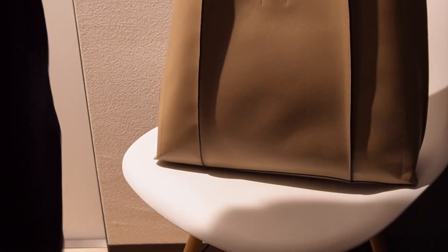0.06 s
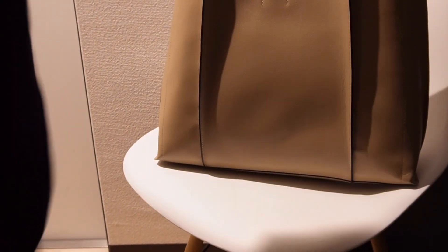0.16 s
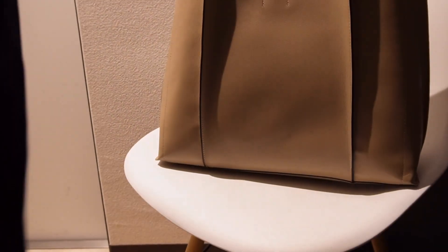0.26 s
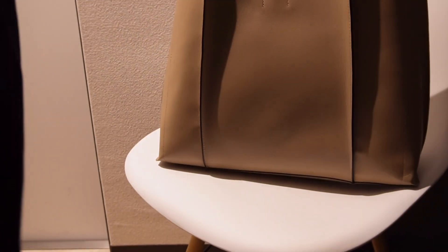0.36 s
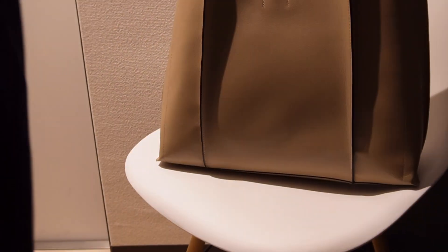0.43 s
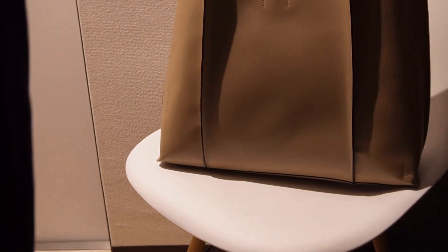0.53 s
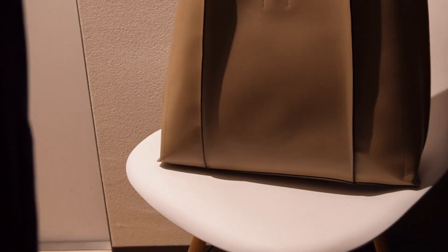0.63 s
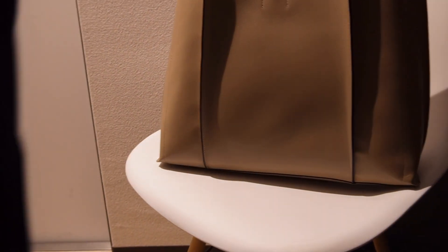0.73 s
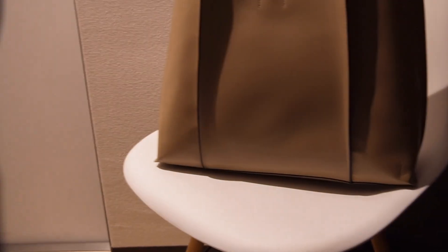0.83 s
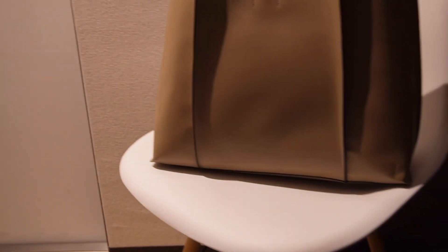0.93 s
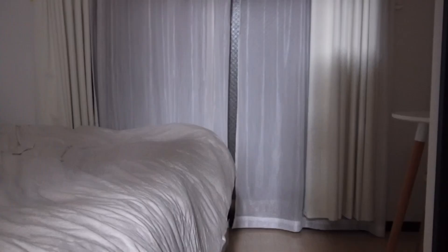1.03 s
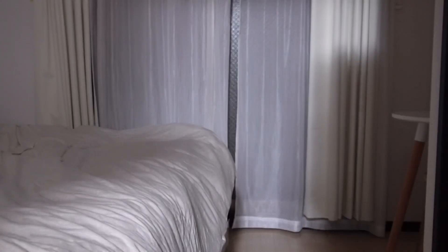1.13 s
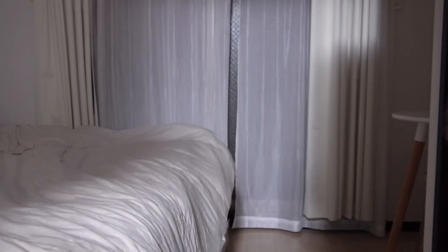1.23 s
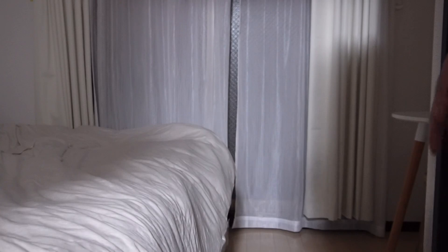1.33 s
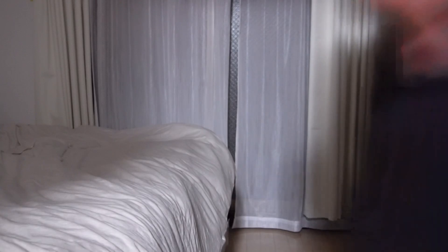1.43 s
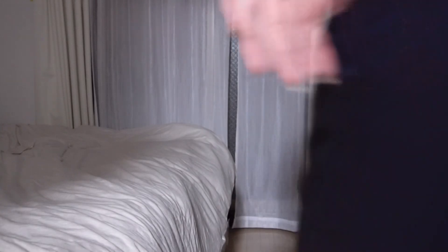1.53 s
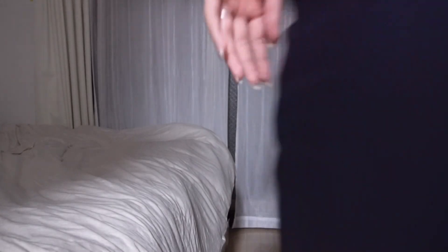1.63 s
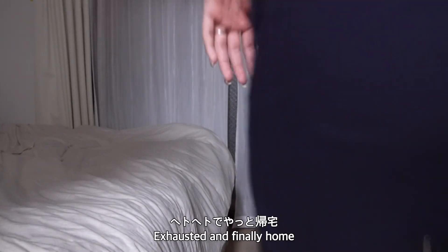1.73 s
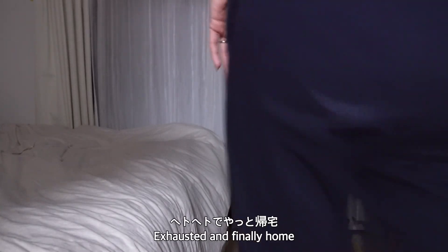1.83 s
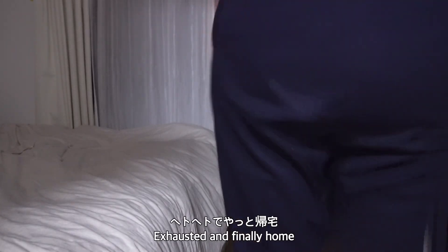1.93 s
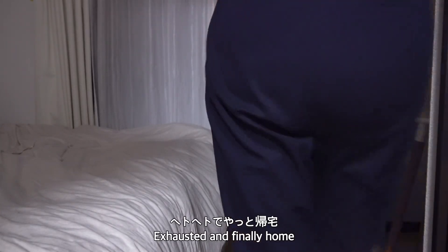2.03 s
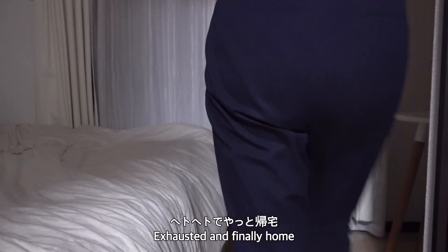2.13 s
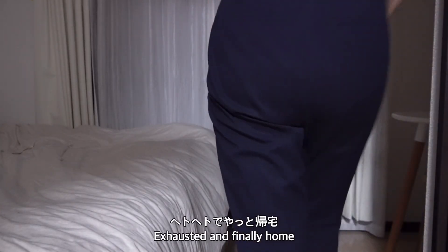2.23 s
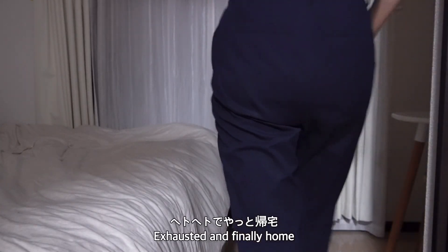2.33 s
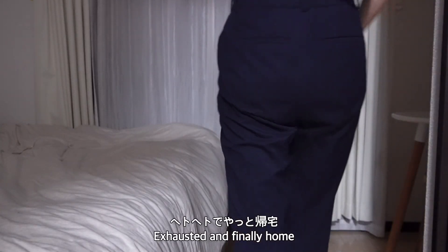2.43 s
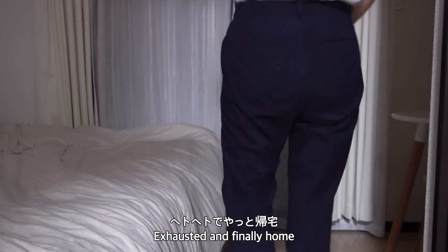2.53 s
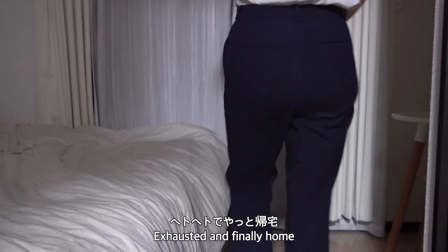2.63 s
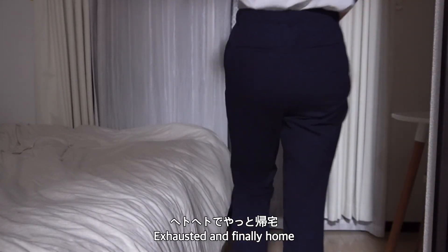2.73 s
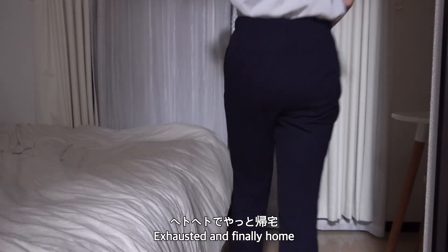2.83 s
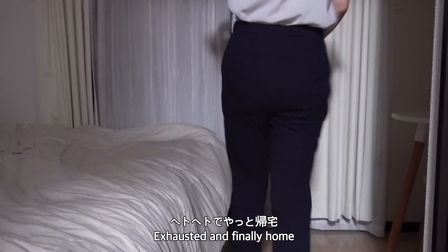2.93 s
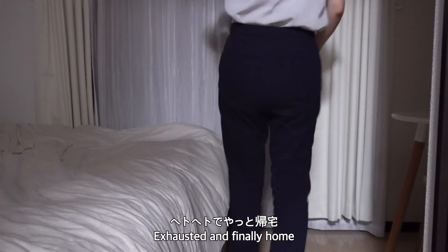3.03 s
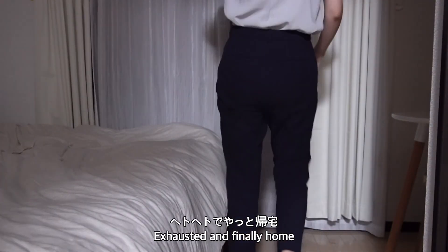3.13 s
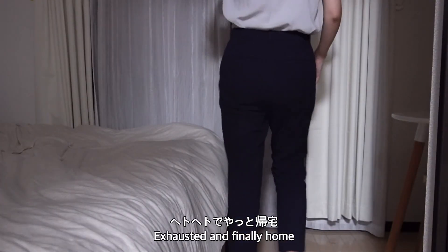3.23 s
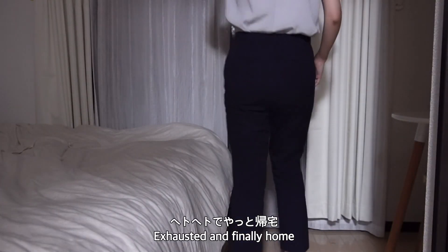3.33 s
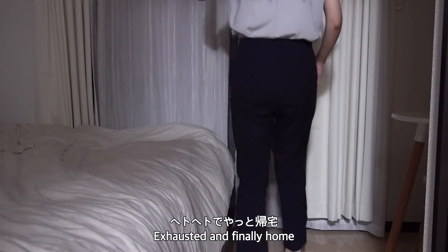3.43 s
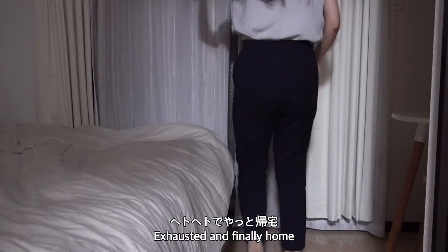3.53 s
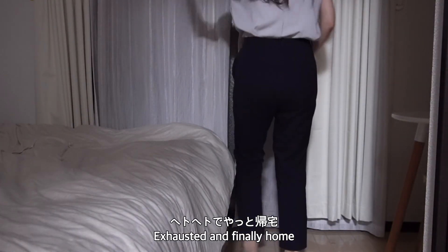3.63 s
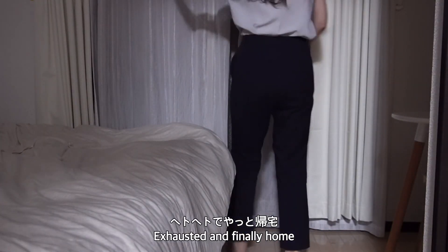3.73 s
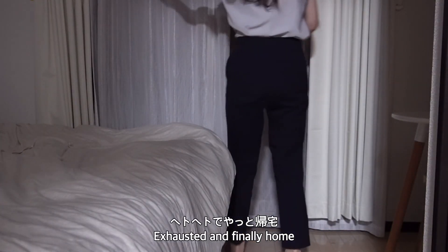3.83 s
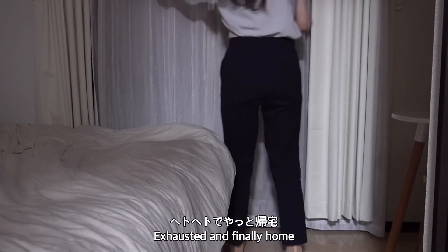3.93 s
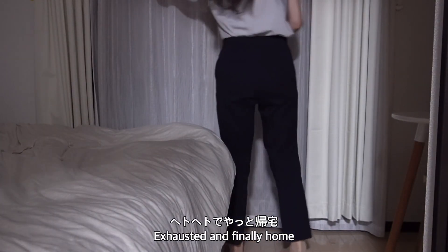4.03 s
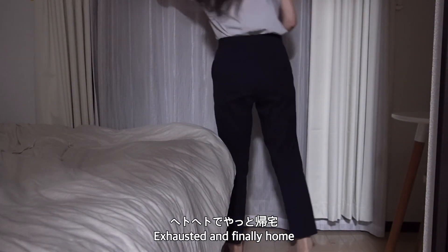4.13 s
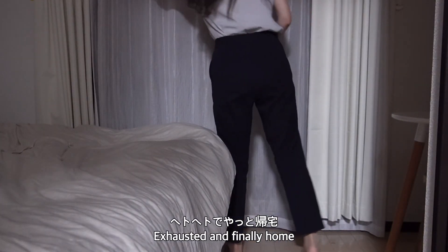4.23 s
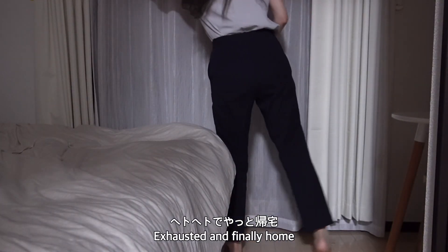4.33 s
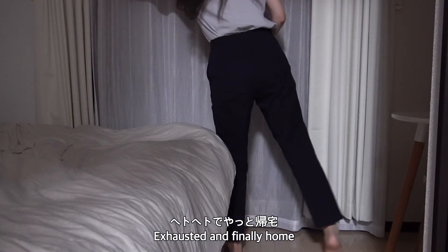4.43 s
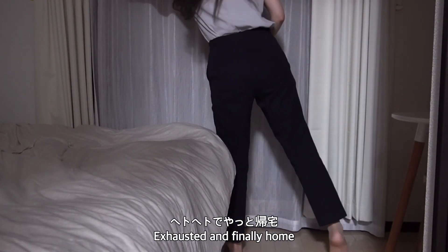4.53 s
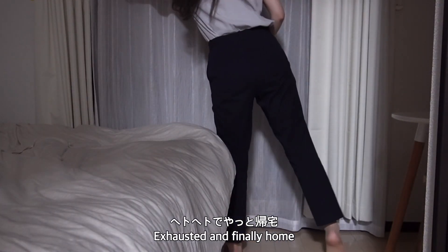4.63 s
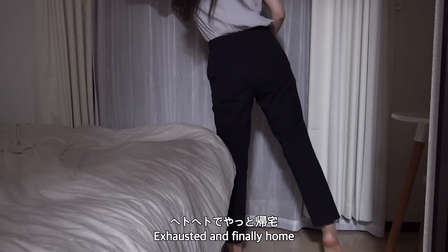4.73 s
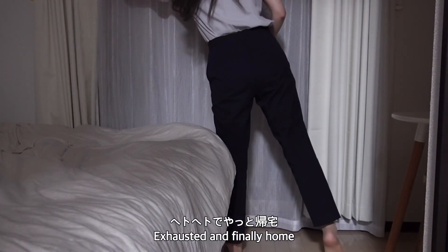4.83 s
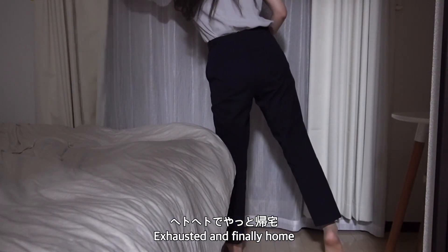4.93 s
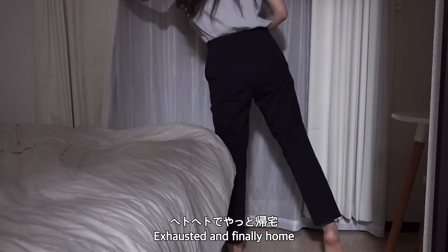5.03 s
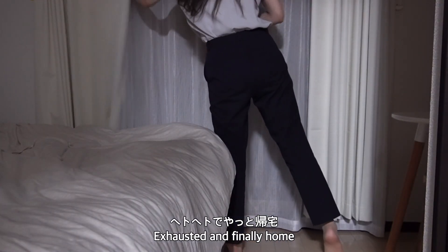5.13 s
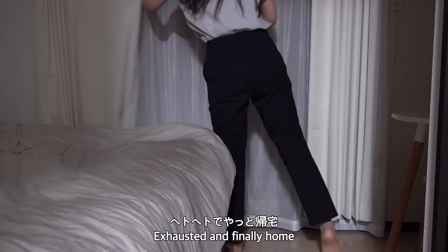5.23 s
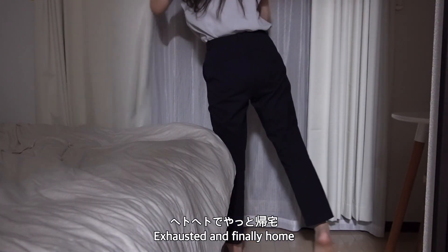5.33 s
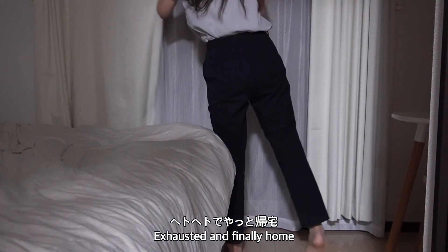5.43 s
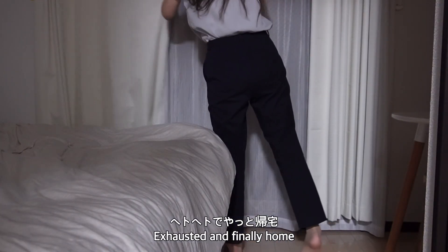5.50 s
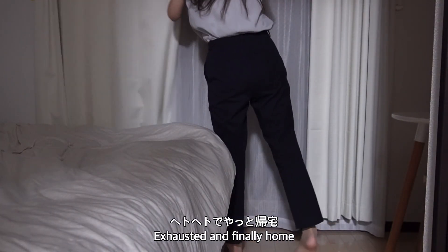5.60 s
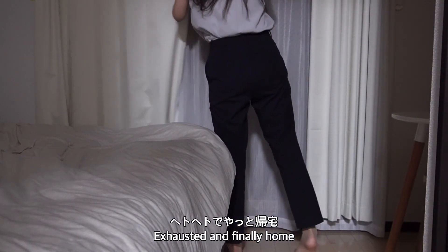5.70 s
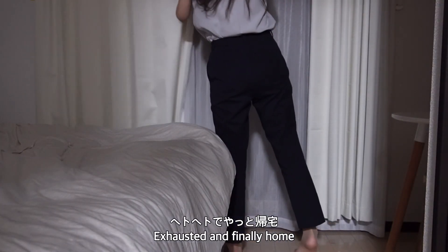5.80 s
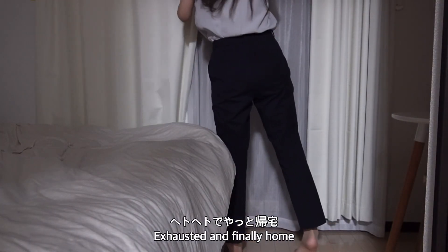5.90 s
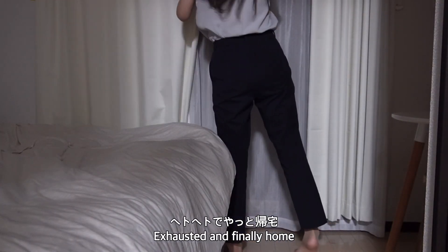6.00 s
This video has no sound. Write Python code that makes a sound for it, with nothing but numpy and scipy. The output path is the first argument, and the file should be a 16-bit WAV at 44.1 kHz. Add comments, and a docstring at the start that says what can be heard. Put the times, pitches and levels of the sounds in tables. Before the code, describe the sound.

Clothes rustle as someone puts down a bag, walks softly across a quiet room and pulls a curtain along its rail.

```python
"""A quiet bedroom, heard on a stereo microphone over a low household hum. Nearby, someone sets a bag on
a chair, ringing the seat, and walks to the window with swishing trousers, soft heels and a slipper's slap.
Farther off, a heavy curtain is pulled along its metal rail: the gliders rush, rattle and knock together,
and their ticks set the rail ringing. The level dips briefly just after the bag lands."""
import sys
import numpy as np
from scipy import signal
from scipy.io import wavfile

SR = 44100
rng = np.random.default_rng(int(sys.argv[2]) if len(sys.argv) > 2 else 0)


def digitize_waveform(pressure):
    """Quantize a signal to 16-bit integers and store it at the path in sys.argv[1].

    Rows of a 2-D input are taken as channels; values are limited to [-1, 1].
    """
    field = np.atleast_2d(pressure).T
    bounded = np.clip(field, -1, 1)
    quanta = np.round(bounded * 32767).astype(np.int16)
    wavfile.write(sys.argv[1], SR, quanta)


N = 267246

# spectrum of the household hum: frequency_hz, relative_db
HUM_SPECTRUM = [(20, -4), (70, -4), (186, 0.5), (275, 1.5), (334, -8), (560, -4.5), (750, -8.5), (1200, -9),
                (2000, -11), (4000, -14), (7000, -20), (10000, -27.5), (15600, -31)]
# slow swell of the hum: time_s, level_db
HUM_SWELL = [(0, -63.5), (.4, -67), (1.2, -60.5), (1.75, -64), (3.5, -62), (4.65, -66), (5.3, -61.5),
             (6.06, -64.5)]
# wavering tones in the hum: pitch_hz, width_hz, before_dip_db, after_dip_db
LOW_TONES = [(132.3, 11, -78.5, -75.5), (221.6, 21, -75.5, -80.5), (387, 43, -85.5, -78.5),
             (537.3, 42, -80.5, -71.5)]
# left-right likeness of hum and clothes at the microphone: frequency_hz, correlation
NEAR_CORRELATION = [(60, 0.92), (180, 0.86), (550, 0.62), (1650, 0.84), (4970, 0.75), (15000, 0.047)]
# brief dip of the whole sound: time_s, gain_db
LEVEL_DIP = [(1.036, 1), (1.044, -6), (1.0535, -25), (1.054, 0)]
# swishes of clothes, and the short hiss trailing the first taps; rise and fall span 20 dB:
# peak_s, level_db, rise_s, fall_s, centre_hz, treble_db_per_octave, bass_db_per_octave
SWISHES_AND_TAP_TAILS = [(.075, -59, 0.22, 0.15, 4300, 2.5, 0.5), (.168, -61, 0.033, 0.1, 3760, -2, 4.5),
                         (.27, -66, 0.21, 0.42, 3100, 0.5, 2), (.402, -66.5, .02, 0.11, 2700, -1, 6),
                         (0.524, -58, .03, 0.023, 2690, -12, 4.5), (.78, -47, 0.14, .17, 2610, 1, 1),
                         (.99, -63, 0.23, .1, 2580, -2, 2), (1.06, -53, 0.043, .2, 2700, 6, -2),
                         (1.1, -45, 0.11, 0.19, 4430, -6.5, 0.5), (1.204, -42.5, 0.12, 0.28, 2700, 3, -0.5),
                         (1.35, -46, 0.33, 0.41, 2730, 3.5, -1), (1.565, -47, 0.2, 0.062, 3900, 0.5, 0.5),
                         (1.66, -60, .3, 0.92, 3300, 1.5, 1), (1.965, -53.5, 0.48, 0.27, 3400, -1, 2.5),
                         (2.262, -51, 0.073, 0.31, 3740, -1.5, 1.5), (2.54, -57, 0.52, 0.31, 3250, 0, 1),
                         (2.85, -46.5, 0.12, 0.14, 4950, -5.5, -2), (3.06, -56, 0.32, 0.31, 3330, .5, 1),
                         (3.355, -44, 0.1, 0.13, 4360, -3.5, -2.5), (3.48, -59, .2, 0.43, 3300, -0.5, -4),
                         (3.768, -44.5, 0.02, 0.1, 2580, 1.5, 3), (3.94, -64.5, 0.13, .12, 2140, 3, 6),
                         (4.12, -68.5, 0.15, 0.096, 3400, 3.5, 1), (4.642, -65, 0.075, 0.15, 2370, 5.5, 8),
                         (4.748, -65, 0.093, .11, 2500, 3.5, 8), (4.82, -58.5, 0.045, .05, 3660, 1.5, -4)]
# spectral hump of their hiss: from_centre_octaves, relative_db
HISS_SPECTRUM = [(-1.5, -12), (-1, -3.5), (0.53, -1), (0.54, -4), (1, -8), (1.51, -16), (2.5, -34)]
# how far that hiss leans to the left: before_dip_db, after_dip_db
HISS_LEAN = (2, -0.3)
# heels on the floor: start_s, level_db, pitch_hz, t60_s
HEEL_FALLS = [(1.775, -53, 62.4, .2), (3.049, -61, 246, 0.19), (3.35, -55, 97, 0.17),
              (3.431, -55.5, 65, 0.094), (3.763, -48, 173, 0.085), (3.821, -53, 58, 0.16)]
# ticks and scuffs of hands and slippers: start_s, strength_db, pitch_hz, width_octaves, t60_s
SMALL_TAPS = [(.1625, -48, 3850, 0.44, 0.088), (.4022, -51, 1990, 1.6, 0.025),
              (0.5168, -42, 3700, 0.6, 0.028), (1.033, -48, 5200, 1.2, .04), (1.0125, -50.5, 5500, 2, .04),
              (1.566, -37.5, 3960, 2, 0.028), (2.2573, -38, 1900, 0.68, 0.038), (2.389, -46, 490, 1, 0.073),
              (2.8, -49, 450, 0.55, 0.09), (2.948, -48, 550, 0.56, 0.033), (3.7565, -39, 1820, 2.2, 0.18),
              (3.761, -45, 544, 0.84, 0.089), (3.92, -56, 1190, 1.5, 0.093)]
# a slipper slaps and drags: start_s, strength_db, t60_s
SLIPPER_SLAPS = [(2.254, -39.5, 0.12), (2.258, -40, 0.26), (2.282, -45, 0.15), (2.298, -44, 0.17)]
# resonances of its sole: pitch_hz, width_hz, relative_db
SOLE_MODES = [(2610, 96, -1), (4580, 280, 2), (6330, 250, 0)]
# the bag landing on the chair: start_s, strength_db, hardness_db_per_octave
BAG_KNOCKS = [(1.001, -42, 4), (1.0048, -36, -2), (1.0125, -44, 2), (1.0318, -37, 4)]
# modes of the chair seat: pitch_hz, relative_db, t60_s
SEAT_MODES = [(390, -7, 0.065), (670, 0, .045), (1010, -1, .035), (1240, -5, 0.03), (1890, -6, 0.018),
              (2570, -13, .03), (3330, -16, 0.018), (5200, -16, .02)]
# the pull of the curtain, heard as the rush of sliding: time_s, level_db
CURTAIN_PULL = [(4.816, -71), (4.828, -45.5), (4.862, -48), (4.978, -37), (5.104, -32.5), (5.16, -35),
                (5.3, -32.5), (5.34, -28), (5.39, -30), (5.444, -29), (5.716, -35), (5.916, -42),
                (6.06, -50)]
# spectrum of gliders and cloth sliding: frequency_hz, relative_db
RUSH_SPECTRUM = [(88, -66), (150, -31), (258, -18.5), (501, -14), (753, -14.5), (1000, -10.5), (1700, -8.5),
                 (2610, -5.5), (4250, -1), (5790, -5.5), (8880, -16.5), (10400, -12), (12500, -27),
                 (15600, -37)]
# left-right likeness of the rush, out of step below 0: frequency_hz, correlation
RUSH_CORRELATION = [(60, 0.82), (180, 1), (550, 0.94), (1650, .98), (4970, 0.89), (7500, 0.48),
                    (10000, 0.64), (12500, -0.41), (15000, -.6)]
# gliders knocking together: start_s, strength_db, high_ring_strength_db
GLIDER_CLACKS = [(4.8246, -43, -47), (4.913, -34, -47), (4.9844, -33, -34), (5.093, -22, -25),
                 (5.1736, -24, -27), (5.3277, -9.5, -21), (5.335, -23, -31), (5.3614, -34, -52),
                 (5.4494, -40, -32), (5.7244, -43, -38)]
# modes of the metal rail: pitch_hz, width_hz, relative_db
RAIL_MODES = [(954, 77, -7), (1684, 34, -7), (1940, 51, -6), (2660, 61, -5.5), (3320, 30, -1.5),
              (3484, 55, 1), (3680, 64, -2.5), (4170, 66, 1), (4336, 71, -2), (4370, 46, -5),
              (4610, 125, 1.5), (5600, 37, -8), (5580, 120, -2.5), (5990, 48, -2), (10000, 120, -0.5),
              (9980, 89, 0), (10250, 160, -6), (10900, 130, 2.5), (11470, 370, -0.5), (11850, 170, -6),
              (12600, 180, -8), (12600, 260, -1)]

DIP_END_S, PULL_START_S = LEVEL_DIP[-1][0], CURTAIN_PULL[0][0]
ROOM_T60_S, ROOM_DB, ROOM_WIDE_HZ, WALL_CUT_HZ = 0.43, -9, 2510, 5000
SWISH_ROUNDING, STILL_CLOTH_DB = 1.09, -100   # rounding: 1 = pointed peak, 2 = bell
SEAT_SHARE_DB, KNOCK_SCATTER_DB, KNOCK_ATTACK_S = -7, 3, 0.0008
FULL_SPEED_DB = -33   # below this rush the gliders slow: duller, thinner, less ring
BRIGHT_DB_PER_OCTAVE, BODY_DB, BODY_START_DB, BODY_GATHERS_S = 0.38, 1.5, -8, 0.27
GLIDER_TICKS_PER_S, CLACK_T60_S, CLACK_RING_T60_S, CLACK_LOW_CUT_HZ = 2000, 0.05, 0.088, 2800
HIGH_RING_HZ, WIDE_RING_HZ, HIGH_DRIVE_DB, SINK_DB_PER_S_PER_KHZ = 8000, 11000, -34.5, -5.5
CURTAIN_LEFT_DB, NEAR_ROOM_SEND_DB = 0.5, -4
MIC_LOW_CUT_HZ, TOP_CUT_HZ = 60, 15750


def from_db(db):
    """Gain of a level in dB."""
    return 10 ** (np.asarray(db) / 20)


def rms_one(x):
    """Scaled to rms 1."""
    return x / np.sqrt(np.mean(x ** 2) + 1e-20)


def in_time(rows):
    """Columns of a curve, one value a sample."""
    times_s, *columns = np.transpose(rows)
    return [np.interp(np.arange(N) / SR, times_s, column) for column in columns]


def at_hz(points, hz):
    """A spectrum read on a log-frequency axis."""
    frequencies, values = np.transpose(points)
    return np.interp(np.log(hz), np.log(frequencies), values)


def filtered(x, hz, kind, order=2):
    """Butterworth filter."""
    return signal.sosfilt(signal.butter(order, hz, kind, fs=SR, output="sos"), x + 1e-18)


def resonance(x, hz, width_hz):
    """Two-pole peak with gain 1 on top."""
    r = np.exp(-np.pi * width_hz / SR)
    feedback = [1, -2 * r * np.cos(2 * np.pi * hz / SR), r * r]
    return signal.lfilter((1 - r * r) / 2 * np.array([1, 0, -1]), feedback, x + 1e-18)


def drift(rate_hz):
    """Slow random wander of spread 1: low-passed noise drawn every 40th sample."""
    r = np.exp(-2 * np.pi * rate_hz * 40 / SR)
    slow = signal.lfilter([1], [1, -2 * r, r * r], rng.standard_normal(N // 40 + 2002))[2000:]
    return np.interp(np.arange(N) / 40, np.arange(len(slow)), rms_one(slow))


def grains(per_s, uneven_db):
    """Random tiny slips of uneven size; rms 1."""
    sizes = from_db(uneven_db * np.minimum(rng.exponential(1, N), 5)) * rng.choice([-1, 1], N)
    return rms_one(sizes * (rng.random(N) < per_s / SR))


def bursts(rows):
    """Envelope of sudden blows, each dying with its own t60."""
    out, t = np.zeros(N), np.arange(SR // 2) / SR
    for start_s, peak_db, t60_s in rows:
        at = round(start_s * SR)
        out[at:at + len(t)] += from_db(peak_db - 60 * t / t60_s)[:N - at]
    return out


def band_noise(colour_db, correlation, first_band, flicker_db, flicker_hz, slips=0, slip_share=0):
    """Flickering stereo noise in third octaves, shaped by colour_db(hz), roughened by slips; rms 1."""
    out, edges = 0, 22 * 2 ** (np.arange(first_band, 30) / 3)
    white = rng.standard_normal((2, 2, N))
    rough = white * np.sqrt(1 - slip_share) + np.sqrt(slip_share) * np.abs(slips) * np.sign(white)
    shared_flicker = drift(flicker_hz)
    for k, (low, high) in enumerate(zip(edges, edges[1:])):
        mid, side = filtered(rough[k % 2], [low, high], "band")
        hz = np.sqrt(low * high)
        alike = np.clip(at_hz(correlation, hz), -1, 1)
        gain = from_db(colour_db(hz) + flicker_db * (shared_flicker + 0.88 * drift(flicker_hz)))
        out = out + gain * (np.sqrt(1 + alike) * mid + np.sqrt(1 - alike) * side * [[1], [-1]])
    return rms_one(out)


def household_hum():
    """A low bed of noise with a few wavering tones, whose balance shifts at the dip."""
    bed = band_noise(lambda hz: at_hz(HUM_SPECTRUM, hz), NEAR_CORRELATION,
                     first_band=0, flicker_db=0.73, flicker_hz=8.4)
    white, before_dip = rng.standard_normal(N), np.arange(N) < DIP_END_S * SR
    tones = sum(from_db(np.where(before_dip, before_db, after_db)) * rms_one(resonance(white, hz, width))
                for hz, width, before_db, after_db in LOW_TONES)
    return from_db(in_time(HUM_SWELL)[0]) * bed + tones


def bedroom_tail(x):
    """Diffuse reflections, centred in the bass and wide in the treble, dulled by soft furnishings."""
    t = np.arange(SR // 3) / SR
    mid, side = rng.standard_normal((2, len(t))) * from_db(-60 * t / ROOM_T60_S) * (t > 0.004)
    tails = mid + filtered(side, ROOM_WIDE_HZ, "high") * [[1], [-1]]
    tails = filtered(tails, WALL_CUT_HZ, "low", order=1)
    tails /= np.sqrt(np.sum(tails ** 2, axis=1, keepdims=True))
    return from_db(ROOM_DB) * signal.fftconvolve(x[None], tails, axes=1)[:, :N]


def heel_thuds():
    """A soft heel sets the floor swinging for a few cycles."""
    out, t = np.zeros(N), np.arange(SR // 2) / SR
    attack = 1 - np.exp(-t / 0.0015)
    for start_s, level_db, hz, t60_s in HEEL_FALLS:
        at = round(start_s * SR)
        out[at:at + len(t)] += from_db(level_db - 60 * t / t60_s) * attack * np.sin(2 * np.pi * hz * t)
    return out


def taps():
    """Hands and slippers touch things: each a click with a puff of noise behind it, round one pitch."""
    out, noise = np.zeros(N), rng.standard_normal(N)
    for start_s, strength_db, hz, octaves, t60_s in SMALL_TAPS:
        low, high = np.clip(hz * 2 ** (np.array([-0.5, 0.5]) * octaves), 50, 0.45 * SR)
        push = noise * bursts([(start_s, strength_db, t60_s)])
        push[round(start_s * SR)] += 4.5 * from_db(strength_db)   # the click
        make_up = np.sqrt(SR / 2 / (high - low))   # for the noise outside the band
        out += 0.5 * make_up * filtered(push, [low, high], "band")
    return out


def slipper_slap():
    """Friction noise of the slap, coloured by the sole's resonances."""
    friction = rng.standard_normal(N)
    sole = sum(from_db(db) * rms_one(resonance(friction, hz, width)) for hz, width, db in SOLE_MODES)
    return 0.28 * rms_one(sole) * bursts(SLIPPER_SLAPS)


def clothes_and_tap_tails():
    """Grainy hiss of fibres slipping in swishes, also trailing the first taps; the loudest colours it."""
    peak_s, peak_db, rise_s, fall_s, *colours = np.array(SWISHES_AND_TAP_TAILS).T[:, :, None]
    t = np.arange(0, N / SR + 0.002, 0.002)
    from_peak = np.where(t < peak_s, (peak_s - t) / rise_s, (t - peak_s) / fall_s)
    power = from_db(2 * np.maximum(peak_db - 20 * from_peak ** SWISH_ROUNDING, STILL_CLOTH_DB))
    total = power.sum(axis=0)
    blend = [(power * colour).sum(axis=0) / total for colour in colours]
    level_db, centre_hz, treble_tilt, bass_tilt = in_time(np.transpose([t, 10 * np.log10(total), *blend]))
    lean_db = np.where(np.arange(N) < DIP_END_S * SR, *HISS_LEAN) * [[0.5], [-0.5]]

    def hump_db(hz):
        octaves = np.log2(hz / centre_hz)
        tilt_db = np.where(octaves > 0, treble_tilt, bass_tilt) * np.abs(octaves)
        return np.interp(octaves, *np.transpose(HISS_SPECTRUM)) + tilt_db
    hiss = band_noise(hump_db, NEAR_CORRELATION, first_band=12, flicker_db=0.55, flicker_hz=24,
                      slips=grains(per_s=2500, uneven_db=0.66), slip_share=0.3)
    return from_db(level_db + lean_db) * hiss


def bag_on_chair():
    """Each knock of the soft bag rings the seat's modes; a harder knock favours the high ones."""
    out, t = np.zeros(N), np.arange(SR // 4) / SR
    attack = 1 - np.exp(-t / KNOCK_ATTACK_S)
    for start_s, strength_db, hardness in BAG_KNOCKS:
        at = round(start_s * SR)
        for hz, mode_db, t60_s in SEAT_MODES:
            level_db = strength_db + SEAT_SHARE_DB + mode_db + hardness * np.log2(hz / 1000)
            level_db += rng.normal(0, KNOCK_SCATTER_DB)
            envelope = from_db(level_db - 60 * t / t60_s) * attack
            out[at:at + len(t)] += envelope * np.sin(2 * np.pi * hz * t)
    return out


def sliding_rush(rush_db, slowing_db, pulling_s, clacks):
    """Gliders and cloth rub along the rail, brighter with speed; each clack adds a burst."""
    tilt = BRIGHT_DB_PER_OCTAVE + 0.24 * slowing_db
    surge_db = np.maximum(rush_db - FULL_SPEED_DB, 0)
    body_db = BODY_DB + 0.18 * slowing_db - 0.48 * surge_db   # surges are all gliders, little cloth
    body_db += BODY_START_DB * np.clip(1 - pulling_s / BODY_GATHERS_S, 0, 1)   # the heavy folds join in

    def colour_db(hz):
        bass_share = np.clip(np.log2(2000 / hz), 0, 1)
        return at_hz(RUSH_SPECTRUM, hz) + tilt * np.log2(hz / 4000) + body_db * bass_share
    friction = band_noise(colour_db, RUSH_CORRELATION, first_band=6, flicker_db=0.76, flicker_hz=19,
                          slips=grains(per_s=3000, uneven_db=3), slip_share=0.2)
    return friction * ((pulling_s >= 0) * from_db(rush_db) + 0.13 * clacks)


def rail_ring(rush_db, slowing_db, pulling_s, clacks):
    """Ticks and clacks of the small gliders ring the metal rail's modes."""
    moving = pulling_s >= 0
    ticks = grains(GLIDER_TICKS_PER_S, uneven_db=2.9)
    clacking = filtered(ticks * clacks, CLACK_LOW_CUT_HZ, "high")
    low_ticks = ticks * moving * from_db(rush_db + 6) + 0.92 * clacking
    high_clacks = bursts([(start_s, db, CLACK_RING_T60_S) for start_s, _, db in GLIDER_CLACKS])
    high_drive = moving * from_db(HIGH_DRIVE_DB + 1.4 * slowing_db) + high_clacks
    # the high ring spreads along the rail, so each channel gets ticks partly of its own
    own = np.array([grains(GLIDER_TICKS_PER_S, uneven_db=2.7) for _ in range(2)])
    spreads = np.array([0.93 * ticks + 0.4 * own, 0.36 * ticks + 1.34 * own]) * high_drive
    # ticks narrowed to a band round 10 kHz, keeping the high ring's top soft
    high_ticks, wide_ticks = resonance(spreads, hz=10400, width_hz=3400)
    ring = 0
    for hz, width_hz, mode_db in RAIL_MODES:
        wander_db = 2.35 * drift(rate_hz=6.7)   # strength changes as the gliders travel
        # modes above 10 kHz fade as the folds spread over the rail
        sink_db = SINK_DB_PER_S_PER_KHZ * max(hz / 1000 - 10, 0) * pulling_s * moving
        drive = wide_ticks if hz > WIDE_RING_HZ else high_ticks if hz > HIGH_RING_HZ else low_ticks
        ring = ring + from_db(mode_db + wander_db + sink_db) * resonance(drive, hz, width_hz)
    return ring


def curtain():
    """One pull, with gliders knocking together, drives both the rush and the ring."""
    rush_db, = in_time(CURTAIN_PULL)
    slowing_db = np.minimum(rush_db - FULL_SPEED_DB, 0)
    pulling_s = np.arange(N) / SR - PULL_START_S
    clacks = bursts([(start_s, db, CLACK_T60_S) for start_s, db, _ in GLIDER_CLACKS])
    motion = rush_db, slowing_db, pulling_s, clacks
    return sliding_rush(*motion), rail_ring(*motion)


def scene():
    """All sources at the microphone; the blows are nearer than the rail, so they raise less room."""
    rush, ring = curtain()
    blows = taps() + bag_on_chair() + slipper_slap()
    at_window = (rush + ring) * from_db([[CURTAIN_LEFT_DB], [0]])
    into_room = from_db(NEAR_ROOM_SEND_DB) * blows + ring.mean(axis=0)
    nearby = clothes_and_tap_tails() + blows + heel_thuds()
    return nearby + at_window + bedroom_tail(into_room) + household_hum()


def record(dry):
    """The level dips briefly; the microphone drops the deepest bass, and the very top is cut."""
    dip_db, = in_time(LEVEL_DIP)
    heard = filtered(dry * from_db(dip_db), MIC_LOW_CUT_HZ, "high")
    return signal.sosfilt(signal.ellip(14, 0.3, 60, TOP_CUT_HZ, fs=SR, output="sos"), heard)


dry = scene()
out = record(dry)
digitize_waveform(out)
```